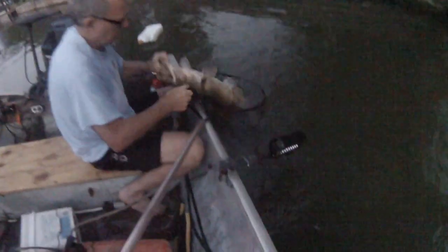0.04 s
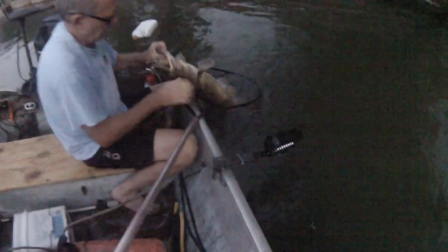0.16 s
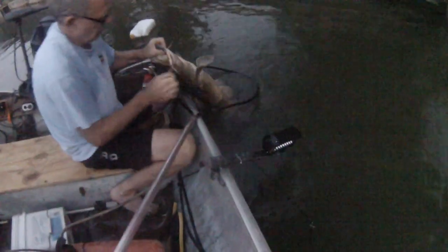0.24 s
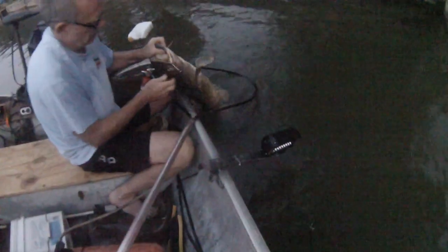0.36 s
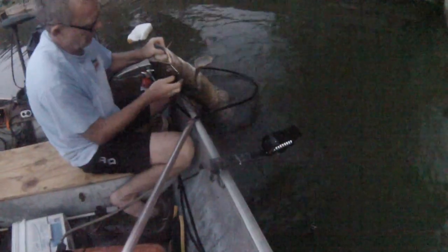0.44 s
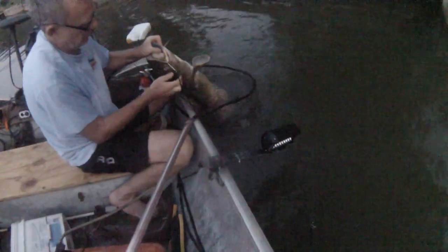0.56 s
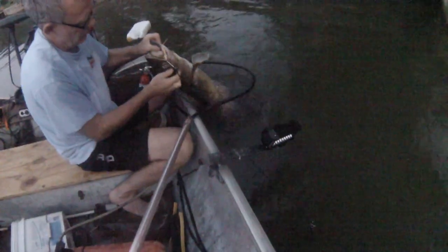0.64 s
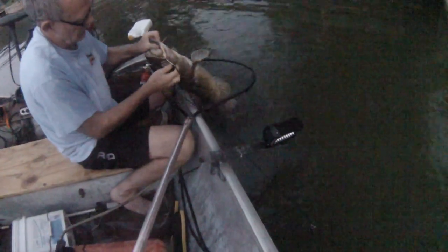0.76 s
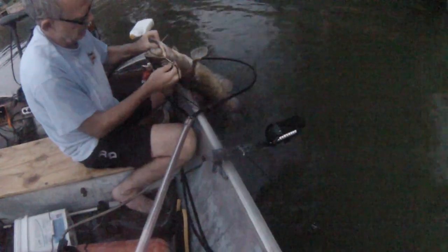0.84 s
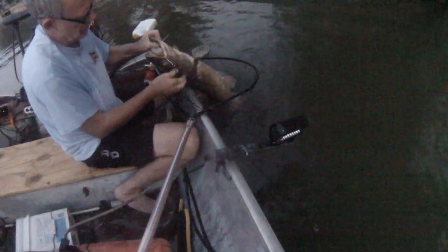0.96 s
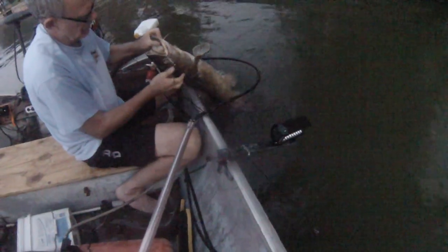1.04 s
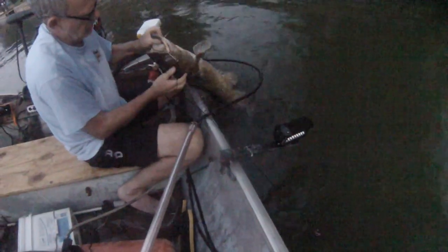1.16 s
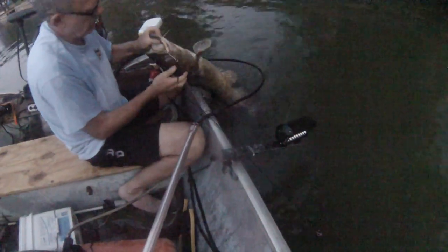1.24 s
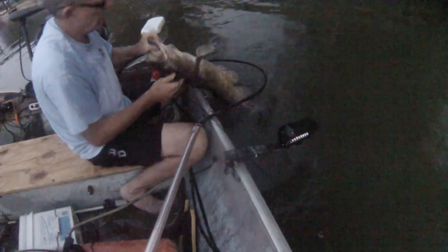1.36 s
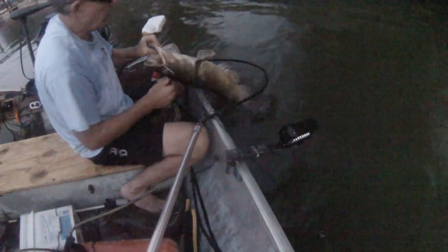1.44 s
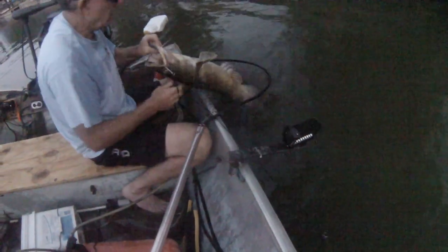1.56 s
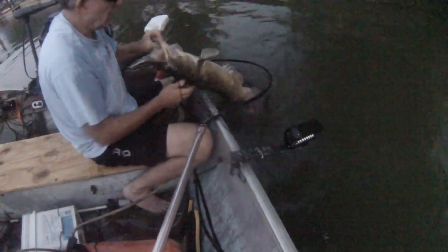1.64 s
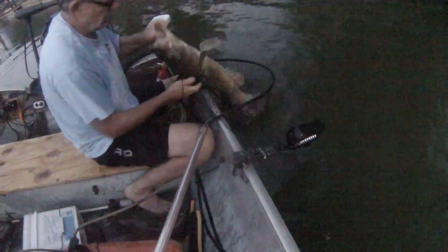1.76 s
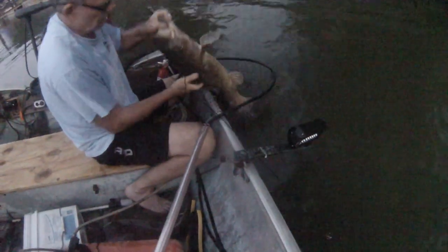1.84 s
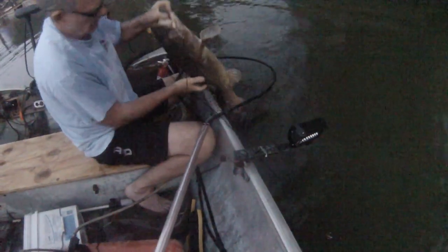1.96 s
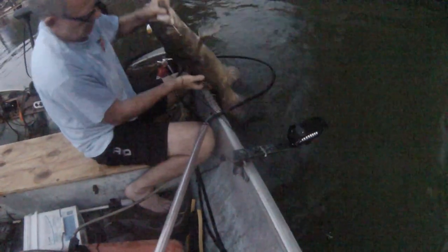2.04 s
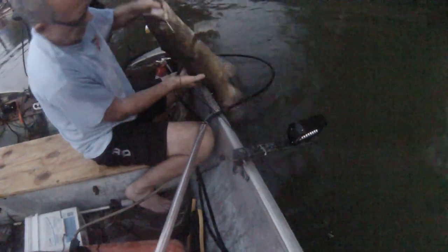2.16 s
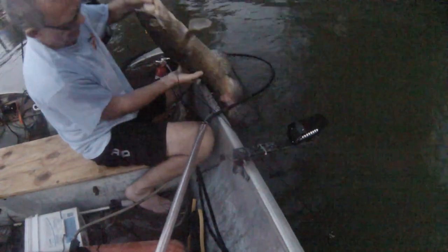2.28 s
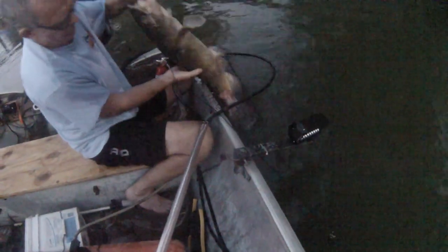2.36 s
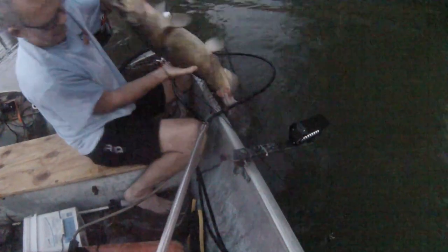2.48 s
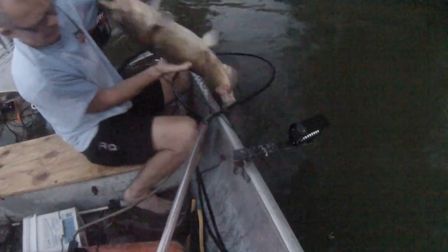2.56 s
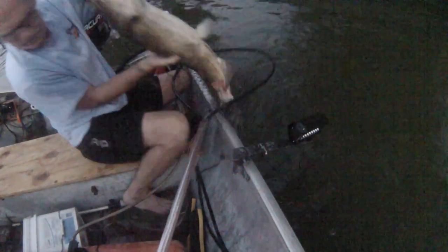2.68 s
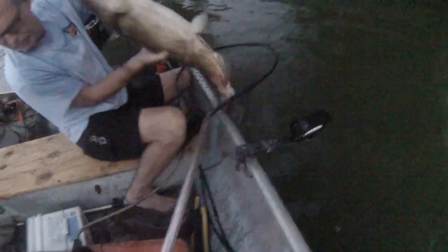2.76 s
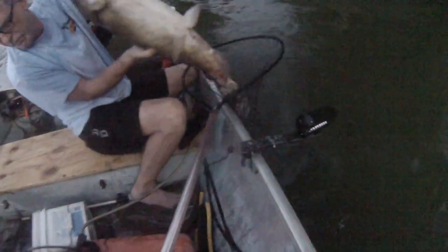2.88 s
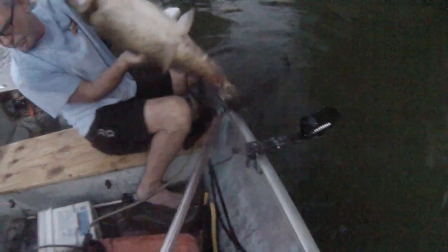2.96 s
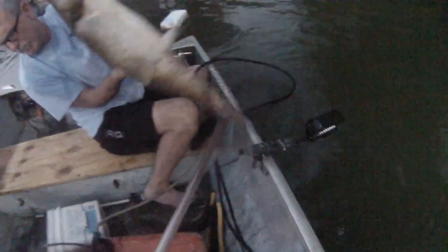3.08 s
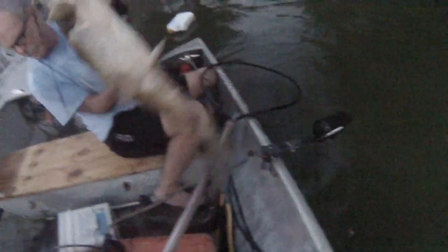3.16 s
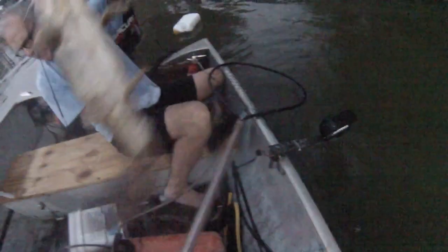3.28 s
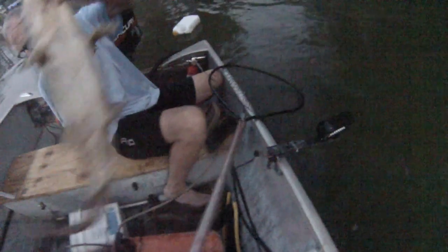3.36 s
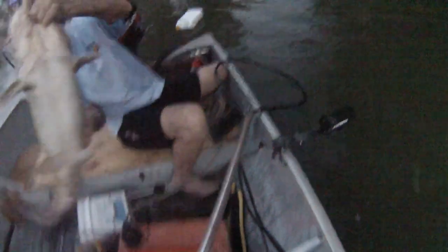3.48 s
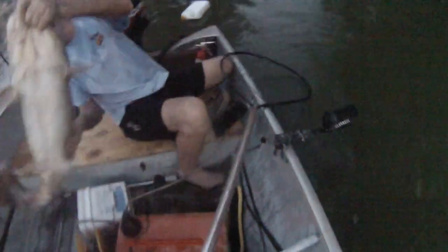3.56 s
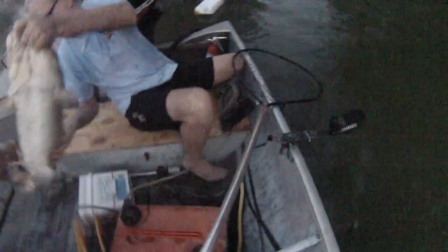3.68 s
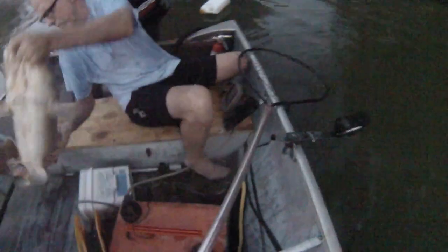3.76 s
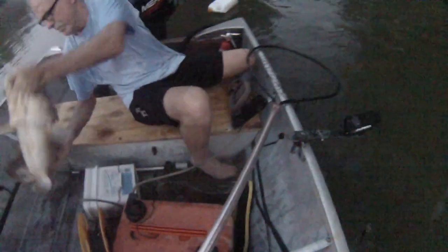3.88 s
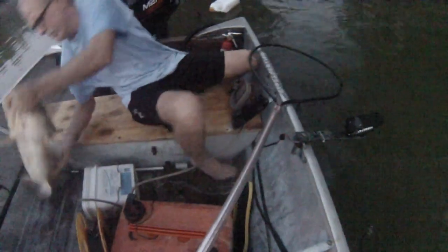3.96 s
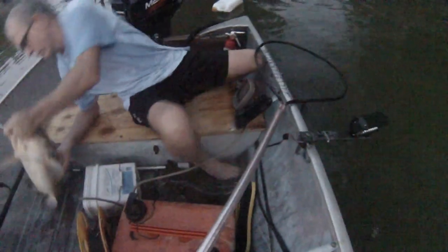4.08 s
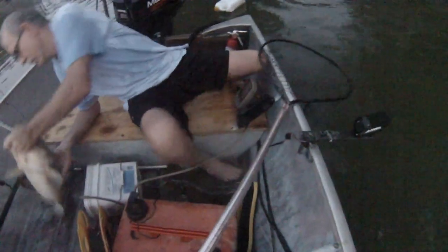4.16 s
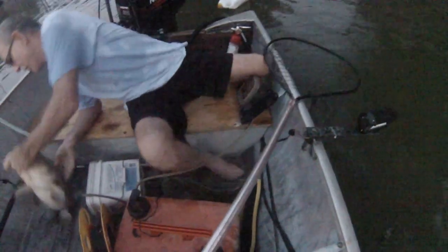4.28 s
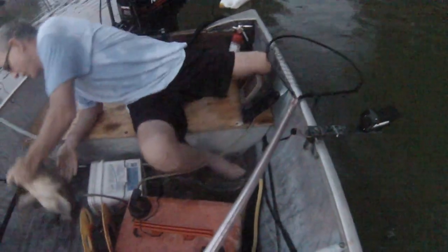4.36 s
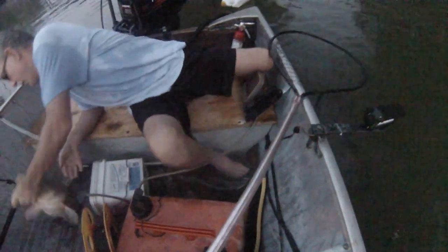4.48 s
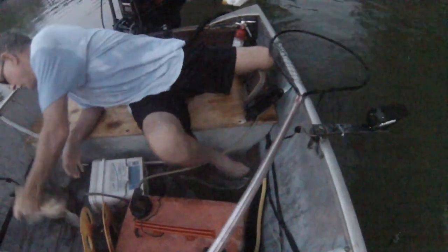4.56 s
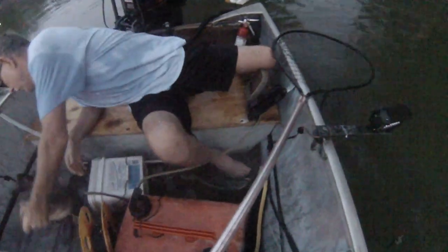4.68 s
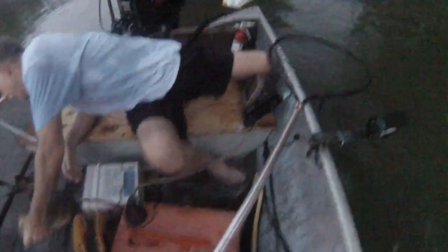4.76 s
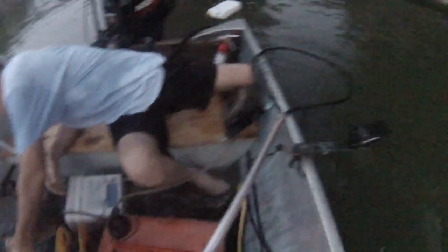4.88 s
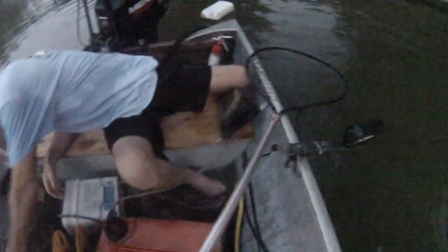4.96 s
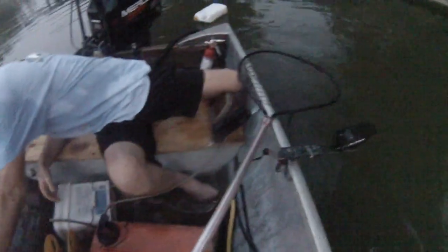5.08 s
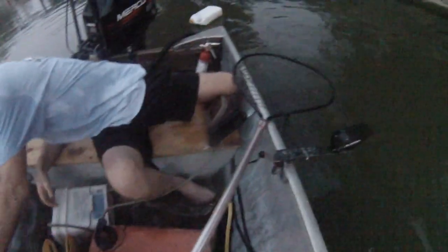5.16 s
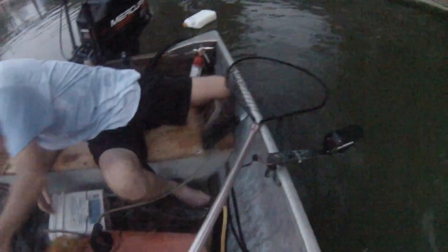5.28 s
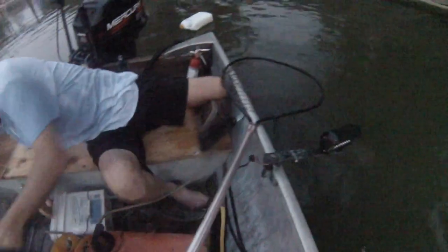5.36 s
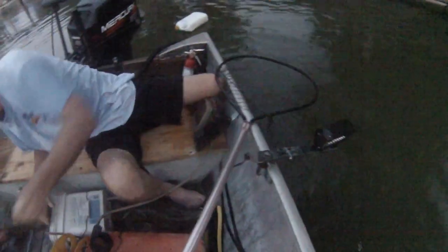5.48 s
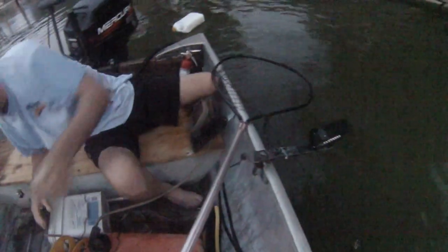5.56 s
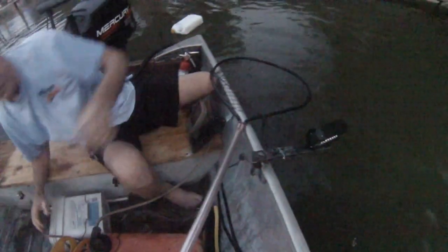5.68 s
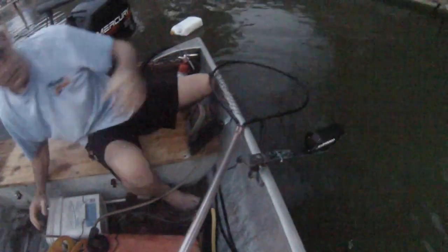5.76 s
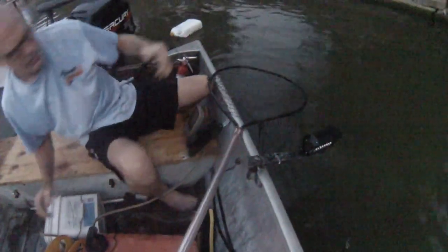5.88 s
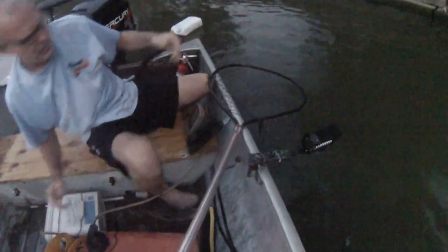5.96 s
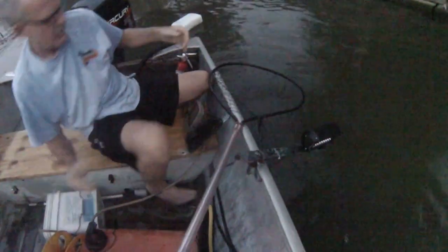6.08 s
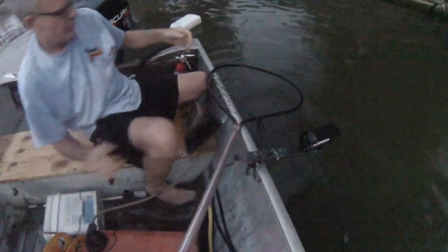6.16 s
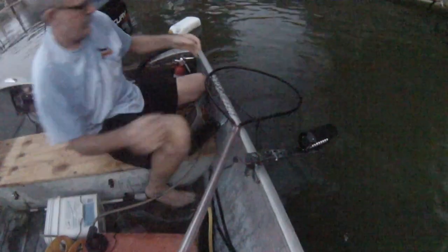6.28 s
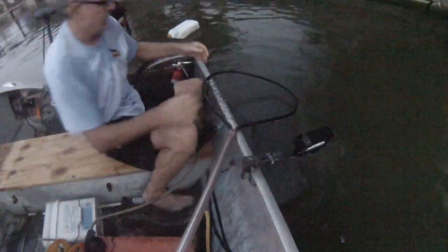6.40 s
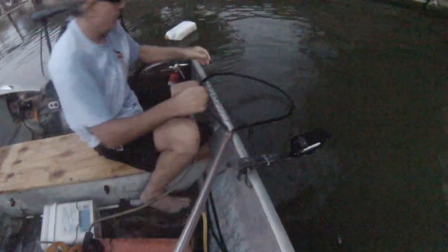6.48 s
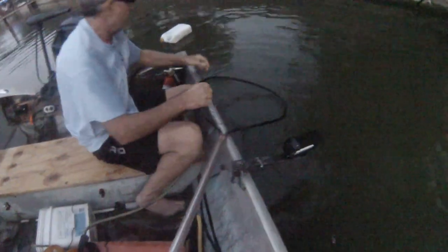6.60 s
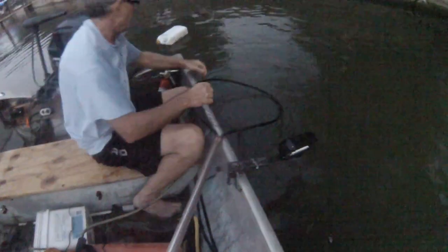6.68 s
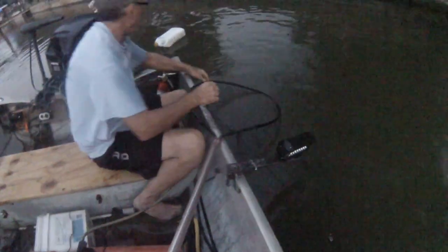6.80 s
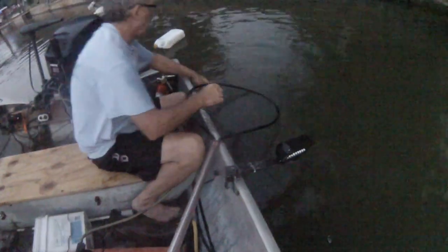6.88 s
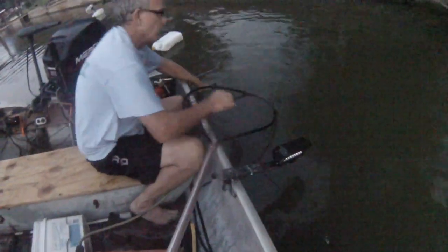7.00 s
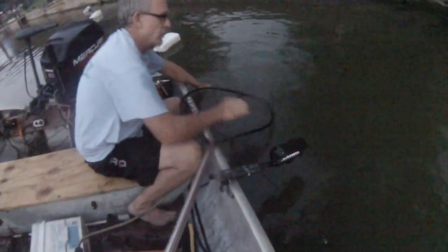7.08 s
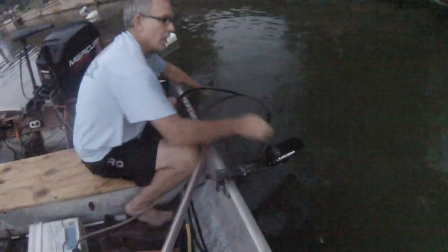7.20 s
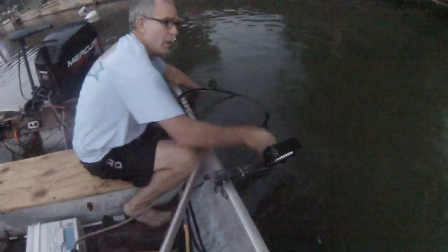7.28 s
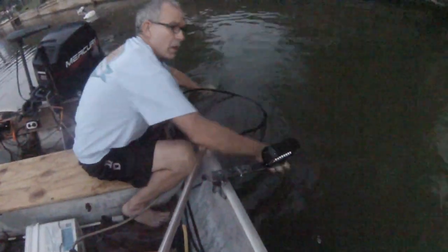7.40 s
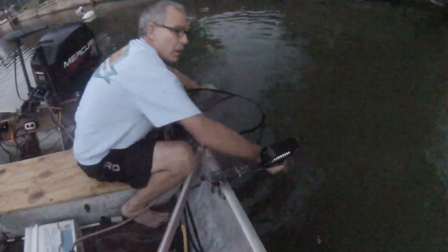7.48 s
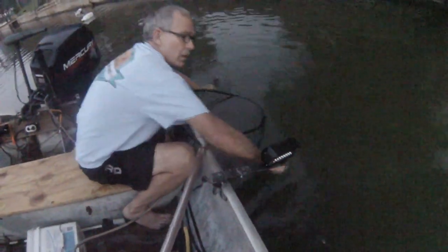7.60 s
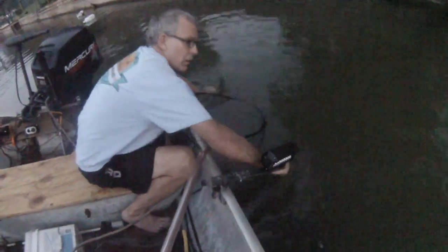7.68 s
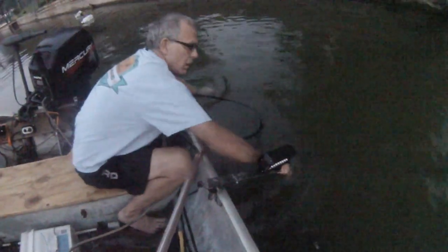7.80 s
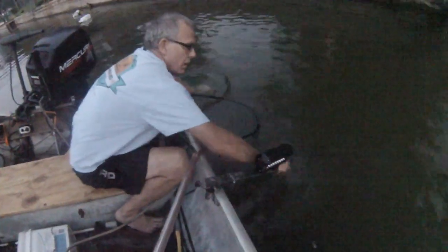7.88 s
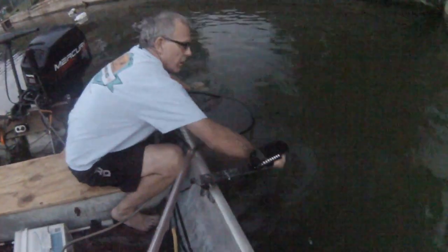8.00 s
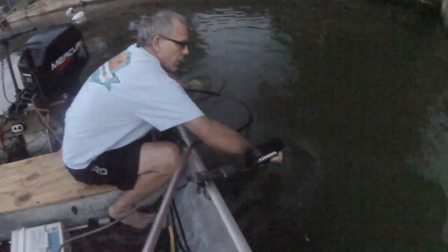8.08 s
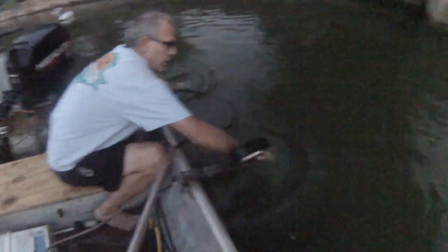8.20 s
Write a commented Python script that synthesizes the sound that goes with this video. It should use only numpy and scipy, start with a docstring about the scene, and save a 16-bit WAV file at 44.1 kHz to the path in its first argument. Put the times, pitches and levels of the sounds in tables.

```python
"""A catfish is hauled from the water into a small metal boat: it thuds on the floor, slaps, splashes and thrashes.
Its blows ring the modes of the hull plates; slaps are noise bursts, water is bubbles and noise, sliding is rough noise.
Then a clamp on a rod holder snaps in a run of damped contacts. Songbirds whistle gliding and warbling tones from
the trees on the bank, and a low motor hum, faint tones, rumble and open air lie behind it all."""
import sys
import numpy as np
from scipy import signal
from scipy.fft import rfft, irfft, next_fast_len
from scipy.io import wavfile
from scipy.ndimage import uniform_filter1d, map_coordinates

SR = 44100
rng = np.random.default_rng(int(sys.argv[2]) if len(sys.argv) > 2 else 0)


def wav_out(sig):
    """Save sig, one row per channel (or a flat mono array), as 16-bit PCM at SR to the path in sys.argv[1]."""
    wavfile.write(sys.argv[1], SR, np.round(np.clip(np.atleast_2d(sig).T, -1, 1) * 32767).astype(np.int16))


N = 363384  # length in samples


def amp(db):
    """Level: decibels to an amplitude ratio."""
    return 10 ** (np.asarray(db) / 20)


def unit(x):
    """Normalisation: scale to an rms of 1."""
    return x / np.sqrt(np.mean(x ** 2) + 1e-20)


def crest(x):
    """Short-time level: scale so that the loudest 4 ms have an rms of 1."""
    return x / np.sqrt(uniform_filter1d(x * x, size=176).max() + 1e-20)


def seconds(length):
    """Sampling: the time axis of a sound of this length in seconds."""
    return np.arange(int(length * SR)) / SR


def add(track, s, x):
    """Superposition: mix x into the track at time s."""
    part = track[max(0, round(s * SR)):][:len(x)]
    part += x[:len(part)]


def gain(points, hz):
    """Spectral envelope: gain through (Hz, dB) points on a log frequency axis."""
    f, db = np.transpose(points)
    return amp(np.interp(np.log(hz + 1), np.log(f), db))


def filtered(x, response):
    """Linear filtering: multiply the spectrum of x by a response of frequency."""
    m = next_fast_len(len(x) + 8192)  # zero padding
    return irfft(rfft(x, m) * response(np.fft.rfftfreq(m, 1 / SR)), m)[:len(x)]


def coloured(x, points):
    """Spectral shaping: x under a spectral envelope, at an rms of 1."""
    return unit(filtered(x, lambda hz: gain(points, hz)))


def levels(strokes, shape):
    """Envelopes: for both level columns, each stroke swells, sags while it lasts and dies away."""
    t = np.arange(N) / SR
    attack, sag, release = shape
    out = np.zeros((2, N))
    for s, length, *db in strokes:
        age = np.maximum(t - s, 0)
        fade_db = -abs(sag) * age - abs(release) * np.maximum(age - length, 0)
        swell = np.clip(.5 + (t - s) / attack, 0, 1)
        out += amp(db)[:, None] * swell * amp(fade_db)
    return out


def wobble(rate):
    """Slow modulation: a smooth random curve with rate knots a second."""
    knots = rng.standard_normal(int(N * rate / SR) + 4)
    return map_coordinates(knots, [np.arange(N) * rate / SR])


def grains(rate, low_hz, high_hz, cycles, scatter_db, rise):
    """Bubble resonance: random damped sines, rate a second, whose pitch rises as they die."""
    u = rng.random((int(rate * N / SR), 3))
    t = seconds(.02)
    hz = low_hz * (high_hz / low_hz) ** u[:, 1:2]
    age = hz * t / cycles
    size = amp(scatter_db * np.minimum(-np.log(u[:, 2:]), 4))
    phase = 2 * np.pi * hz * t * (1 + rise * np.minimum(age, 1))
    waves = size * np.exp(-3 * age) * np.sin(phase)
    at = (u[:, :1] * N).astype(int) + np.arange(len(t))
    return unit(np.bincount(at.ravel(), waves.ravel(), N)[:N])


def ring(modes, weight, t, scatter_db):
    """Modal synthesis: decaying modes; each blow lands on a new spot, so strengths and signs are redrawn."""
    hz, db, t60 = np.transpose(modes)[:, :, None]
    sign = rng.choice([-1, 1], hz.shape)
    size = sign * weight(hz) * amp(db + scatter_db * rng.standard_normal(hz.shape))
    return np.sum(size * amp(-60 * t / t60) * np.sin(2 * np.pi * hz * t), axis=0)


def echo(x, t60, dull_hz):
    """Reverberation: a diffuse noise tail of reflections with unit energy."""
    t = seconds(0.92)
    tail = filtered(rng.standard_normal(len(t)), lambda hz: 1 / (1 + (hz / dull_hz) ** 2))
    tail *= amp(-60 * t / t60) * (1 - np.exp(-t / 0.0031))
    return signal.fftconvolve(x, tail / np.linalg.norm(tail))[:N]


# Modes of the hull plates. Each row: frequency in Hz, relative level in dB, t60 in s when undamped.
HULL_MODES = [(57.7, 1, 0.099), (92.7, -0.5, 0.23), (134.4, -1.5, 0.24), (165, 0, 0.061), (220, -1.5, 0.14),
              (245, -8, 0.24), (302.6, -2, 0.11), (366.2, -5, 0.22), (440, -29, 0.094), (504, -2, 0.13),
              (552, -20, 0.25), (578, -25, 0.42), (647, -11, 0.26), (738, -14, 0.3), (797, -0.5, 0.072),
              (881, 0.5, 0.075), (918, -0.5, 0.066), (1006, -7, 0.13), (1126, -4.5, 0.099),
              (1435, -16, 0.13), (1745, 3, .2)]


def blow(centre_hz, spread, damping, rattle_db=-3, rattle_t60=0.13, attack=0.00021):
    """Modal excitation: one blow rings the plate modes around its centre; loose gear rattles along."""
    t = seconds(.6)
    weight = lambda hz: 1 / (1 + (np.log2((hz + 1) / centre_hz) / spread) ** 6)
    plates = crest(ring(HULL_MODES, weight, t, scatter_db=-0.5))
    rattle_response = lambda hz: weight(hz) / np.sqrt(hz + 100) / (1 + (hz / 2000) ** 4)
    rattle = filtered(rng.standard_normal(len(t)), rattle_response)
    both = plates + amp(rattle_db) * crest(rattle * amp(-60 * t / rattle_t60))
    # a softer, lower blow takes longer to build up
    build_up = 1 - np.exp(-t / (attack + 0.2 / centre_hz))
    return crest(both * amp(-damping * t) * build_up)


# Landings of the fish on the hull. Each row: start in seconds, level of the first contact in dB,
# level of the weight in dB, centre of the modes under the weight in Hz, their spread in octaves.
LANDINGS = [(.091, -38, -46, 524, 0.43), (.769, -52, -56, 800, 0.52), (2.503, -52, -37.5, 234, 0.75),
            (2.522, -59, -38, 201, 0.59), (3.139, -64, -38.5, 226, 0.46), (3.166, -39, -34.5, 240, 0.36),
            (4.02, -48.5, -20, 87, 1.2), (4.078, -57, -32.5, 140, 1.14), (4.254, -45, -43.5, 111, 1.05),
            (5.037, -43.5, -45, 298, 1.5), (5.1052, -19.5, -18.5, 280, 0.88),
            (5.119, -31.5, -19, 240, 0.38), (5.168, -48.5, -31, 219, 1.6), (5.247, -26.5, -25.5, 296, 1.4),
            (5.282, -18, -22, 216, 1.2), (5.302, -23, -20.5, 305, 1.4), (5.316, -14, -15.5, 175, 1.5),
            (5.367, -35, -30, 246, 1.3), (5.457, -30.5, -24, 307.6, 0.2), (5.543, -44.5, -34.5, 330, 0.64),
            (5.618, -39, -41, 300, 1.2), (5.743, -42, -38, 260, 1.2)]
CONTACT_HZ, CONTACT_OCTAVES = 747, 0.63  # modes reached by the first contact: centre and spread
WEIGHT_LAG_CYCLES = 1.127  # lag of the weight, in cycles of its centre: later for a softer, lower blow
PINNED_S, PINNED_DB_PER_S = 5.4, 596  # from then on the fish is held down and damps the plates


def hull():
    """Two-stage impact: a hard first contact on the high modes, then the soft weight of the body on the low ones."""
    out = np.zeros(N)
    for s, contact_db, weight_db, centre_hz, spread in LANDINGS:
        damping = PINNED_DB_PER_S * (s > PINNED_S)
        add(out, s, amp(contact_db) * blow(CONTACT_HZ, CONTACT_OCTAVES, damping))
        lag = WEIGHT_LAG_CYCLES / centre_hz
        add(out, s + lag, amp(weight_db) * blow(centre_hz, spread, damping))
    return out


# Wet slaps of the fish. Each row: start in seconds, relative level in dB,
# then the levels of the body band and of the spray band in dB relative to the middle band.
SLAPS = [(0.0104, -39, 1, 7), (0.09, -35.5, -6, -3), (0.1685, -40, -1.5, 2.5), (0.3239, -34, -2, 0.5),
         (0.417, -43, 4.5, 3), (0.619, -40, -2, 0.5), (0.655, -46, 5, 3.5), (0.7684, -48.5, 5.5, -19),
         (.985, -51, -1, -17), (1.406, -56, 0, -16), (1.986, -52, 0, -1), (2.5428, -37, -0.5, -11),
         (2.82, -24.5, -13.5, -12), (3.035, -28, -4, -13.5), (3.1557, -19, -13, -10.5),
         (3.371, -42, 4, -32), (3.731, -46, 3, -26), (4.0185, -45.5, 4, 4.5), (4.1755, -50.5, -12, 2.5),
         (5.1715, -33.5, -2, 2.5), (5.236, -33, 6.5, -13), (5.244, -28, 9, -2.5), (5.26, -25.5, -2, -7),
         (5.2732, -19, 2.5, -7), (5.3162, -21, 5.5, -9), (5.331, -29.5, 1, -1), (5.585, -46, 8, 5),
         (5.6427, -30.5, -7, -4), (5.906, -35.5, -3.5, -15)]
# Spectrum of a slap. Each row: frequency in Hz, relative density in dB per Hz.
SLAP_SPECTRUM = [(240, -19), (400, 10), (519, -7.5), (873, 2.5), (1450, -8), (1710, -5), (2000, -6.5),
                 (2650, -7.5), (2960, -2), (3250, -5), (3900, -11), (4400, -10.5), (5000, -10.5),
                 (5450, -9.5), (6380, -16.5), (8400, -25.5), (11400, -28.5), (15500, -50)]
CLING_S = 0.012  # the skin stays in contact this long; then a faster decay sets in
SLAP_T60_S = 0.11  # that added decay in the middle band; the other bands scale it by their life


def slaps(slap_db=-7.0, spray_db=1.0, body_life=3.7, spray_life=0.37, grit_db=3, sag_db_per_s=300):
    """Band-dependent damping: wet skin meets water or metal in a gritty burst whose spray dies before its body."""
    out, t = np.zeros(N), seconds(.35)
    for s, db, body, spray in SLAPS:
        # each band: low edge in Hz, high edge in Hz, level in dB, life
        bands = [(455, 2150, body, body_life), (1170, 6900, 0, 1.0), (5430, 18000, spray + spray_db, spray_life)]
        for lo, hi, level, life in bands:
            grit = rng.standard_normal(len(t)) * amp(grit_db * rng.standard_normal(len(t)))
            high_pass = lambda hz: (hz / lo) ** 4 / (1 + (hz / lo) ** 4)
            low_pass = lambda hz: 1 / (1 + (hz / hi) ** 12)
            band = filtered(grit, lambda hz: gain(SLAP_SPECTRUM, hz) * high_pass(hz) * low_pass(hz))
            release_db = -60 * np.maximum(t - CLING_S, 0) / (SLAP_T60_S * life)
            burst = crest(band * amp(-sag_db_per_s * t + release_db))
            add(out, s, amp(db + level + slap_db) * burst)
    return out


# Stirs of the tail. Each row: start in seconds, length in seconds, relative slosh level in dB,
# relative spray level in dB.
STIRS = [(0.0, 0.13, -46.5, -44), (.33, 0.25, -53.5, -62), (.62, 0.12, -52.5, -60), (.8, .29, -65, -84),
         (2.41, 0.079, -54, -64.5), (2.54, 0.13, -49.5, -72), (2.7, 0.13, -55.5, -61.5),
         (2.83, 0.12, -51, -59), (3.04, 0.069, -48.5, -56), (3.16, 0.048, -64, -57),
         (3.5, 0.079, -52.5, -70)]
# Envelope of a stir: attack in seconds, sag in dB per second, release in dB per second.
STIR_SHAPE = (0.01, 10, 167)
# Spectrum of the bubbling wash. Each row: frequency in Hz, relative density in dB per Hz.
SLOSH_SPECTRUM = [(250, 6), (450, -3.5), (650, -4.5), (870, -3.5), (1170, -4), (1450, -23), (1850, -2.5),
                  (2300, -16), (3050, -3), (4300, -20), (5400, -10), (7000, -42), (10000, -58)]
# Spectrum of the falling drops. Each row: frequency in Hz, relative density in dB per Hz.
SPRAY_SPECTRUM = [(880, -42), (1500, -24), (3000, -10.5), (3510, 0), (3950, -7), (5560, -1.5), (8370, -14),
                  (11700, -9.5), (15500, -32)]


def water(spray_db=-1, wash=0.97, mist=1.0, crackle_db=-6, churn_db=-0.2):
    """Bubble acoustics: the tail stirs up bubbles in a soft wash; fine drops fall back in a dense crackle."""
    slosh, spray = levels(STIRS, STIR_SHAPE)
    bubbles = grains(rate=1400, low_hz=461, high_hz=5050, cycles=9.1, scatter_db=2.0, rise=0.097)
    bubbles = bubbles + wash * rng.standard_normal(N)
    drops = grains(rate=900, low_hz=1940, high_hz=12700, cycles=1.1, scatter_db=-0.5, rise=0.046)
    drops = drops + mist * rng.standard_normal(N)
    ticks = grains(rate=600, low_hz=894, high_hz=6100, cycles=2.2, scatter_db=5, rise=0.046)
    stirred = coloured(bubbles, SLOSH_SPECTRUM) + amp(crackle_db) * ticks
    falling = amp(spray_db) * coloured(drops, SPRAY_SPECTRUM)
    return amp(churn_db * wobble(70)) * (slosh * stirred + spray * falling)


# Pockets of air and drips in the water. Each row: start in seconds, relative level in dB,
# settled pitch in Hz, t60 in seconds.
PLOPS = [(2.407, -41, 660, 0.028), (2.495, -43, 590, .09), (2.541, -32.5, 1160, 0.035),
         (2.686, -41, 1250, .03), (2.76, -46, 510, 0.15), (2.8, -44, 1650, 0.028), (2.844, -34, 740, 0.045),
         (2.86, -38.5, 650, 0.17), (2.953, -34, 1020, 0.017), (3.016, -34, 980, 0.11),
         (3.047, -40, 830, .17), (3.502, -41.5, 617, .06), (3.567, -41, 870, .06),
         (4.196, -43.5, 1110, 0.11), (6.997, -49, 920, .05), (7.097, -55, 820, .04),
         (7.4, -56, 1850, 0.067), (7.706, -53, 2170, .05)]


def plops(plop_db=-6, sag=0.12, sag_s=0.01, flutter_db=1.0):
    """Cavity resonance: each pocket of air rings with a flutter, and its pitch sags at first as it opens."""
    out, t = np.zeros(N), seconds(.2)
    for s, db, hz, t60 in PLOPS:
        pitch = hz * (1 + sag * np.exp(-t / sag_s))
        flutter = flutter_db * wobble(180)[:len(t)]
        fade = amp(flutter - 60 * t / t60) * (1 - np.exp(-t / 0.00023))
        add(out, s, amp(db + plop_db) * crest(np.sin(2 * np.pi * np.cumsum(pitch) / SR) * fade))
    return out


# Slides of the fish over the side and the floor. Each row: start in seconds, length in seconds,
# rub level in dB, relative level of the wet hiss in dB.
SLIDES = [(.42, 0.26, -73, -62.5), (.8, 0.29, -64, -64.5), (2.53, 0.1, -48.5, -50),
          (3.145, 0.082, -45, -79), (5.06, 0.1, -42, -56.5), (4.03, 0.22, -45, -63.5),
          (4.26, 0.05, -51, -73), (5.1, 0.26, -37.5, -51), (5.272, 0.044, -36.5, -32),
          (5.35, 0.032, -30, -53), (5.4, 0.091, -42, -55.5), (5.57, 0.23, -40.5, -57)]
# Envelope of a slide: attack in seconds, sag in dB per second, release in dB per second.
SLIDE_SHAPE = (0.034, 6.9, 270)
# Spectrum of the rub. Each row: frequency in Hz, relative density in dB per Hz.
RUB_SPECTRUM = [(15, -34), (25, 7.5), (106, -4), (171, -2.5), (257, -6), (314, -3), (398, -11),
                (926, -17.5), (1310, -31), (2000, -28), (2600, -57.5), (4400, -120)]
# Spectrum of the wet skin. Each row: frequency in Hz, relative density in dB per Hz.
SKIN_SPECTRUM = [(700, -26.5), (1200, -8), (1700, -14), (2900, -4.5), (4000, -10.5), (5500, -7),
                 (7500, -15.5), (12000, -21), (15400, -33.5)]


def slide(hiss_db=1, film_db=2):
    """Stick-slip friction: the body scrubs in small slips; tiny bubbles burst in the film under the wet skin."""
    rub, hiss = levels(SLIDES, SLIDE_SHAPE)
    slips = amp(2.8 * wobble(130))
    floor = coloured(slips * rng.standard_normal(N), RUB_SPECTRUM)
    film = grains(rate=700, low_hz=946, high_hz=7100, cycles=14, scatter_db=3.5, rise=0.05)
    skin = coloured(slips * rng.standard_normal(N) + amp(film_db) * film, SKIN_SPECTRUM)
    return rub * floor + amp(hiss_db) * hiss * skin


# Contacts of the clamp. Each row: start in seconds, level in dB, pitch of the contact in Hz,
# level of the crack in dB relative to the contact.
SNAPS = [(7.7906, -30, 1110, -27), (7.7912, -36.5, 4550, -7), (7.7952, -24, 1095, -18),
         (7.7956, -29.5, 2800, -22), (7.802, -29.5, 2290, -20), (7.8038, -44.5, 7000, -11),
         (7.811, -58, 1090, -9), (7.831, -54, 2700, -2), (7.846, -51, 1150, 0), (8.185, -55.5, 1090, 2),
         (8.214, -42, 2000, 2), (8.228, -45, 905, 0.5)]
# Modes of the clamp. Each row: frequency in Hz, relative level in dB, t60 in seconds.
CLAMP_MODES = [(348, 1.5, 0.04), (754, 1.5, 0.031), (930, -0.5, 0.016), (1153, 4, 0.025), (1380, -8, .016),
               (1630, 0, 0.021), (1940, 3.5, 0.017), (2300, -1, 0.015), (2820, -4.5, 0.031),
               (4480, -3, 0.013), (5100, -13, .015), (7030, -15, .012)]
# Spectrum of its loose parts. Each row: frequency in Hz, relative density in dB per Hz.
RATTLE_SPECTRUM = [(200, -21), (350, -1), (520, -7), (850, 8.5), (1500, -2), (2600, -1), (3500, -14),
                   (4700, -9), (6000, -24), (12000, -24), (15500, -41)]
FOCUS_DB, FOCUS_OCTAVES = 17.5, 0.37  # how far a contact favours modes near its pitch, and over what range


def clamp(crack_t60=0.045, shake_db=-27, shake_t60=0.36):
    """Local modal excitation: a quick run of hard, well damped contacts, each on its own part; loose parts shake on."""
    out, t = np.zeros(N), seconds(0.25)
    for s, db, pitch_hz, crack_db in SNAPS:
        nearness = lambda hz: np.exp(-(np.log2(hz / pitch_hz) / FOCUS_OCTAVES) ** 2)
        focus = lambda hz: amp(FOCUS_DB * nearness(hz)) / (1 + (pitch_hz / hz / 3) ** 2)
        modes = crest(ring(CLAMP_MODES, focus, t, scatter_db=4.0))
        fade = amp(crack_db - 60 * t / crack_t60) + amp(shake_db - 60 * t / shake_t60)
        rattle = fade * coloured(rng.standard_normal(len(t)), RATTLE_SPECTRUM)
        add(out, s, amp(db) * (modes + rattle))
    return out


def whistle(length, start, middle, end, warble, warble_hz=75, uneven=0.3, swell=1):
    """Frequency modulation: one bird note glides through three pitches, with an uneven warble."""
    t = seconds(length)
    u = t / length
    drift = np.interp(u, np.linspace(0, 1, 8), rng.standard_normal(size=8))
    pace = warble_hz * (1 + uneven * drift)
    bend = np.polyval(np.polyfit([0, .5, 1], [start, middle, end], 2), u)
    hz = bend + warble * np.sin(2 * np.pi * np.cumsum(pace) / SR)
    return np.sqrt(2) * np.sin(np.pi * u ** swell) * np.sin(2 * np.pi * np.cumsum(hz) / SR)


# Slurred bird notes. Each row: start in seconds, length in seconds, start, middle and end pitch in Hz,
# relative level in dB.
SLURS = [(.42, 0.16, 3450, 3480, 3430, -60.5), (1.799, 0.059, 3200, 3430, 3930, -63),
         (1.853, 0.07, 4300, 4270, 3870, -58), (1.868, 0.18, 3400, 3400, 3450, -64.5),
         (2.04, 0.09, 3500, 4230, 4000, -61), (3.616, 0.064, 4250, 3670, 3450, -54),
         (3.795, .08, 4340, 3790, 3570, -55), (3.967, .055, 3900, 4220, 4000, -66),
         (4.435, 0.025, 3650, 3750, 3880, -63), (4.575, 0.07, 3950, 3630, 2400, -51.5),
         (4.654, 0.07, 3950, 4000, 4030, -68), (4.72, 0.086, 4050, 3900, 3720, -60),
         (4.767, 0.1, 3800, 3400, 3350, -47.5), (4.968, 0.13, 3880, 3590, 3530, -49),
         (5.423, 0.039, 3440, 3350, 3360, -36), (5.815, 0.11, 3400, 3150, 2940, -47.5),
         (5.896, 0.064, 2900, 2897, 2950, -49.5), (6.149, 0.126, 3450, 3420, 3420, -56.5),
         (6.281, 0.075, 3960, 4000, 4200, -54.5), (6.397, 0.036, 4660, 4130, 4010, -54),
         (6.5, 0.042, 3270, 3470, 3600, -60), (6.532, .065, 3500, 3020, 2620, -55.5),
         (6.92, 0.35, 5800, 6040, 5920, -73), (7.03, 0.055, 2750, 2890, 3050, -62),
         (7.171, 0.22, 3720, 3740, 3860, -69), (7.47, 0.058, 3230, 3140, 3260, -67),
         (7.615, 0.094, 3950, 4730, 4740, -61.5), (7.527, 0.095, 3330, 3390, 3430, -64),
         (7.7, 0.068, 3520, 3520, 3520, -67), (7.924, 0.077, 3120, 3090, 3050, -65)]
# Trilled bird notes. Each row: start in seconds, length in seconds, middle pitch in Hz,
# warble depth in Hz, relative level in dB.
TRILLS = [(0.618, 0.27, 3550, 110, -65.5), (.92, 0.26, 3500, 100, -69), (1.257, 0.083, 3850, 500, -66),
          (1.471, 0.087, 3690, 110, -62), (1.69, .08, 4400, 250, -66), (2.11, 0.15, 4580, 220, -63),
          (4.449, .06, 4230, 330, -60), (5.521, 0.15, 3590, 85, -50), (5.633, 0.16, 3290, 90, -56),
          (6.031, 0.2, 3125, 270, -52.5), (7.447, .08, 5050, 130, -66.5), (7.89, 0.19, 5270, 400, -66.5)]
SLUR_SWELL = 1.61  # above 1, a slur is loudest late in the note
TRILL_RISE_HZ_PER_S = 620


def birds(direct_db=-2, trees_db=-7.5):
    """Direct and scattered sound: the nearest singers slur along a bend or trill upward, smeared by the trees."""
    out = np.zeros(N)
    for s, length, start, middle, end, db in SLURS:
        add(out, s, amp(db) * whistle(length, start, middle, end, 0, swell=SLUR_SWELL))
    for s, length, hz, warble, db in TRILLS:
        rise = TRILL_RISE_HZ_PER_S * length / 2
        add(out, s, amp(db) * whistle(length, hz - rise, hz, hz + rise, warble))
    return amp(direct_db) * out + amp(trees_db) * echo(out, t60=0.4, dull_hz=9000)


def chorus(chorus_db=-70, direct_db=-5, low_hz=2800, high_hz=4400, glide=0.088, count=260):
    """Diffuse superposition: many far birds chirp and twitter, blurred by the trees into one soft bed."""
    out = np.zeros(N)
    for k, (when, pitch, long, slope, warble) in enumerate(rng.random((count, 5))):
        hz = low_hz * (high_hz / low_hz) ** (pitch ** 1.25)
        bend = glide * hz * (2 * slope - 1)
        length = 0.0507 + .14 * long
        note = whistle(length, hz - bend, hz, hz + bend / 2, 200 * warble, warble_hz=50 + 60 * long)
        add(out, (k + when) / count * N / SR, note * low_hz / hz)  # higher notes are weaker
    return amp(chorus_db) * unit(amp(direct_db) * out + echo(out, t60=0.26, dull_hz=9000))


# Course of the hum. Each row: time in seconds, relative level in dB.
HUM_COURSE = [(0, -50.5), (1.5, -51), (2.2, -46.5), (3.5, -49.5), (4.7, -48), (6.2, -51.5), (7.4, -56.5),
              (8.24, -52.5)]
# Faint low tones. Each row: frequency in Hz, level in dB.
LOW_TONES = [(59.2, -66), (269.2, -71), (333.8, -68.5)]
# A thin high whine. Each row: frequency in Hz, level in dB.
WHINE_TONES = [(8748, -86), (11150, -87), (13050, -81)]
# Spectrum of open air and hiss. Each row: frequency in Hz, relative density in dB per Hz.
AIR_SPECTRUM = [(240, -5.5), (400, 1.5), (750, -1.5), (1300, -7), (2200, -10), (3000, -7.5), (3800, -7.5),
                (5400, -12), (6500, -15.5), (8000, -17), (11500, -15.5), (14500, -18), (15500, -29)]
# Spectrum of the low rumble. Each row: frequency in Hz, relative density in dB per Hz.
RUMBLE_SPECTRUM = [(15, -10), (25, -15), (40, -3), (60, 1.5), (90, -3), (135, -7.5), (200, -14.5),
                   (260, -17), (350, -23), (500, -36), (900, -67)]
HUM_HZ = 167.7


def background(rumble_db=-51.0, hum_db=-1, air_db=-61.5):
    """Tones in noise: a motor hum, faint low tones and a thin whine over low rumble and open air."""
    t = np.arange(N) / SR
    # a slow phase drift keeps each tone slightly unsteady
    tone = lambda hz: np.sqrt(2) * np.sin(2 * np.pi * hz * t + 0.18 * wobble(7.5))
    hum = amp(np.interp(t, *np.transpose(HUM_COURSE)) + hum_db) * tone(HUM_HZ)
    faint = sum(amp(db) * tone(hz) for hz, db in [*LOW_TONES, *WHINE_TONES])
    air = amp(air_db + 0.12 * wobble(1.46)) * coloured(rng.standard_normal(N), AIR_SPECTRUM)
    rumble = amp(rumble_db) * coloured(rng.standard_normal(N), RUMBLE_SPECTRUM)
    return hum + faint + air + rumble


def scene():
    """Superposition: the fish echoes briefly off the hull; clamp, birds and background add without that echo."""
    near = hull() + slaps() + water() + plops() + slide()
    hull_echo = amp(-17.0) * echo(near, t60=0.27, dull_hz=4730)
    return (near + hull_echo + clamp() + birds() + chorus() + background())[None]


TOP_HZ = 15400


def record(dry):
    """Band limiting: nothing passes above the top frequency."""
    return filtered(dry[0], lambda hz: hz < TOP_HZ)[None]


dry = scene()
out = record(dry)
wav_out(out)
```